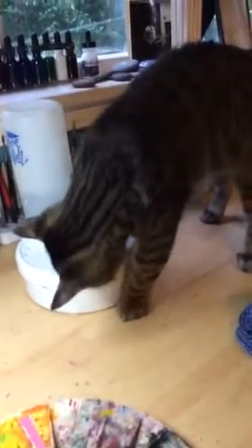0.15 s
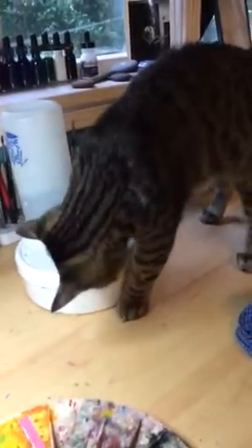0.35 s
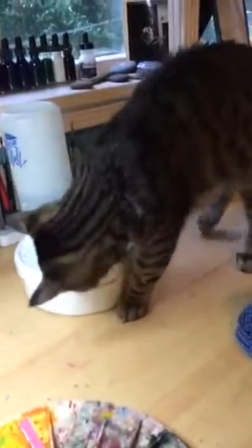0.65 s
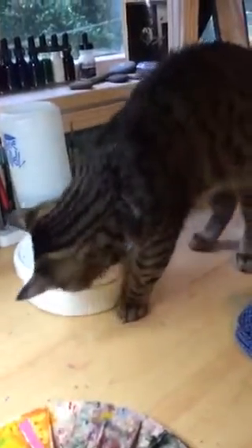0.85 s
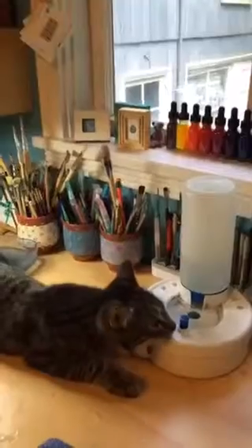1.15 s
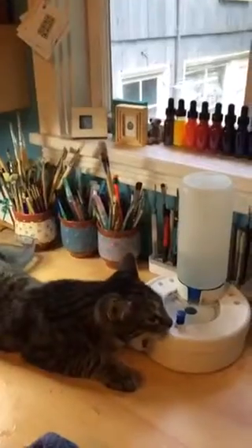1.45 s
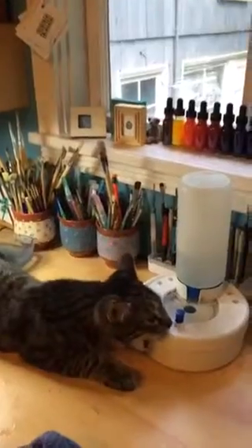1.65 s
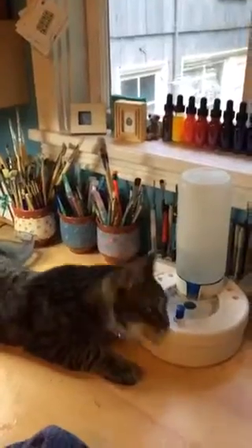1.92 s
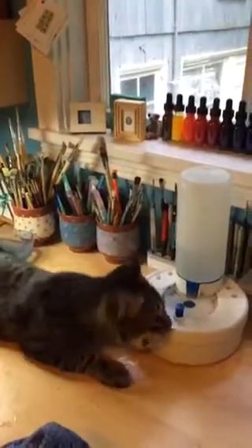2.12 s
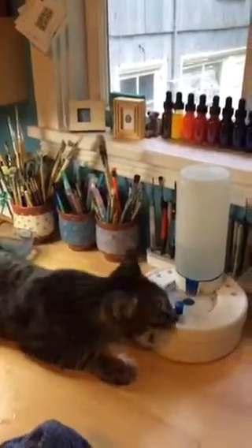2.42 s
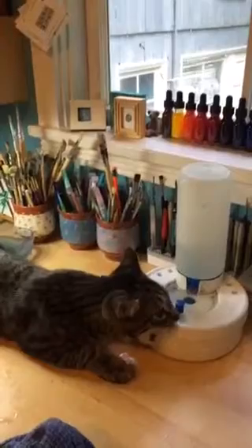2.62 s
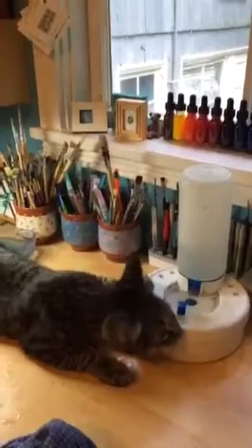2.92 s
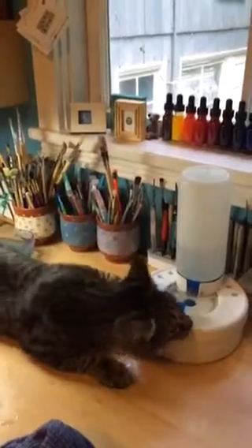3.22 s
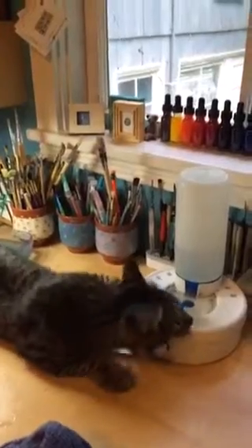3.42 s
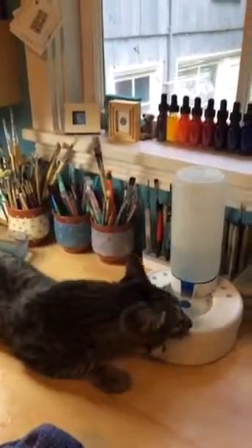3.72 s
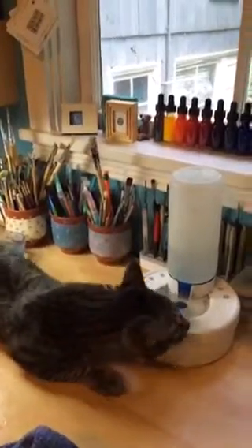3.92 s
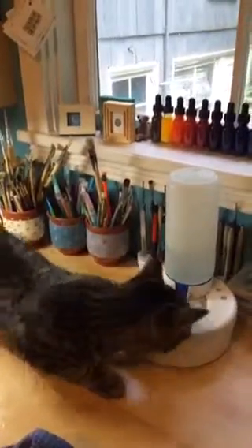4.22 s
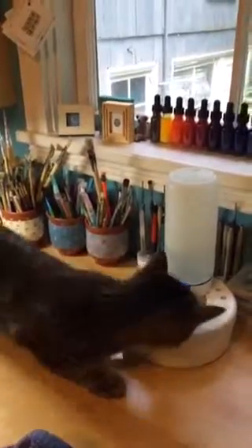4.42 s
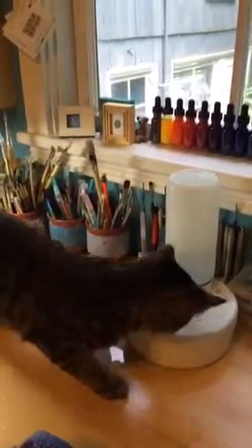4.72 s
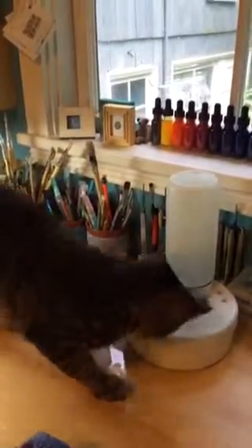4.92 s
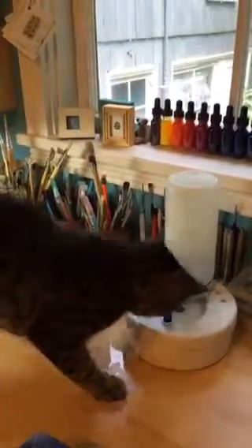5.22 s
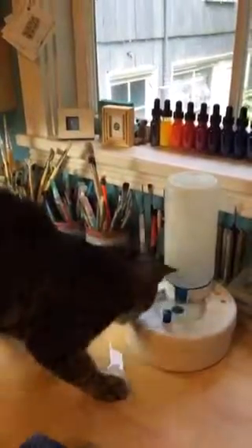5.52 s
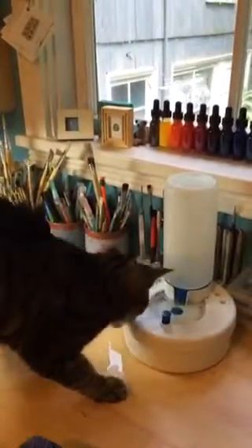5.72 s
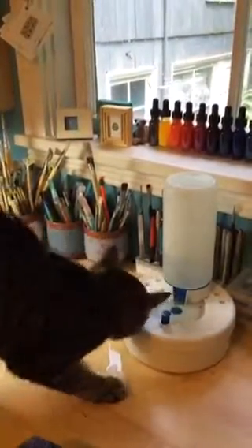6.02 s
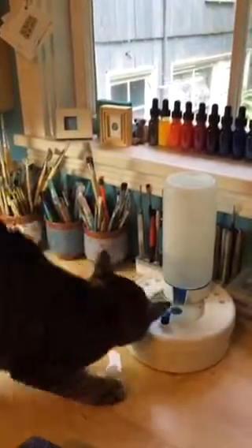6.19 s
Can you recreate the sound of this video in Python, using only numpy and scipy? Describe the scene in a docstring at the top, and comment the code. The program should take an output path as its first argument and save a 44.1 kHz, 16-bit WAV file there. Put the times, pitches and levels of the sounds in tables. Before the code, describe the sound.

A cat noses a plastic water dish on a wooden desk in a small quiet room. Light rim taps grow louder with a tiny water plip, then an instant of total silence and a knock. After that come soft padded bumps, faint fur scuffs and a few heavy, boomy drops of the dish, the sharpest with ticking claws. Hard clacks finish it. Close microphone, low rumble, faint whine.

```python
"""A small, quiet room with a wooden desk, where a cat noses and paws a plastic water dispenser.
Shaped noise makes the rumble and hiss; a wavering tone with overtones makes a faint whine.
Bursts of filtered noise are the brushing fur and ticking claws; damped modes are the hard clacks and bowl taps.
Rising sines are plips of water. Soft pushes and the dropping dish excite the booming desk and plastic base.
The sound drops out once for an instant."""
import sys
import numpy as np
from scipy import signal
from scipy.fft import rfft, irfft, next_fast_len
from scipy.io import wavfile
from scipy.ndimage import map_coordinates

SR = 44100
rng = np.random.default_rng(int(sys.argv[2]) if len(sys.argv) > 2 else 0)


def inscribe(sig):
    """Save sig as 16-bit PCM at rate SR to the path in sys.argv[1].

    A 1-D sig is mono; a 2-D sig holds one channel per row.
    Samples are clipped to [-1, 1] before scaling.
    """
    pcm = np.round(np.clip(np.atleast_2d(sig).T, -1, 1) * 32767)
    wavfile.write(sys.argv[1], SR, pcm.astype(np.int16))


N = 280035  # length [samples]
AGE = np.arange(SR // 2) / SR  # time since a short sound began [s]
GAP_START_S, GAP_END_S = 0.929, 0.953  # the instant of silence
TOP_HZ = 15400  # band limit of the whole sound


def amp(db):
    """Decibels to gain."""
    return 10 ** (np.asarray(db) / 20)


def unit(x):
    """Scale to rms 1."""
    return x / np.sqrt(np.mean(x ** 2) + 1e-20)


def blow(x):
    """Scale a struck sound to rms 1 over its first hundredth of a second."""
    return x / np.sqrt(np.mean(x[:SR // 100] ** 2))


def along(points, hz):
    """Read (frequency [Hz], value) points on a log frequency axis."""
    point_hz, value = np.transpose(points)
    return np.interp(np.log(hz + 1), np.log(point_hz), value)


def fade(t60, t=AGE):
    """Exponential decay, 60 dB down after t60 seconds."""
    return np.exp(-np.log(1000) * t / t60)


def wobble(rate, size=N):
    """A smooth random curve, rate knots a second."""
    knots = rng.standard_normal(int(size * rate / SR) + 4)
    return map_coordinates(knots, [np.arange(size) * rate / SR])


def filtered(x, response):
    """Multiply the spectrum of x by a function of frequency."""
    size = next_fast_len(len(x) + SR // 4)
    hz = np.fft.rfftfreq(size, 1 / SR)
    return irfft(rfft(x, size) * response(hz), size)[:len(x)]


def noise(spectrum, size):
    """Coloured noise of rms 1."""
    return unit(filtered(rng.standard_normal(size), lambda hz: amp(along(spectrum, hz))))


def band(x, centre_hz, octaves):
    """Keep a bell-shaped band, at rms 1."""
    return unit(filtered(x, lambda hz: np.exp(-.5 * (np.log2((hz + 1) / centre_hz) / octaves) ** 2)))


def ring(modes, scatter_db, detune):
    """Sum damped modes; each contact draws new strengths, slight detunings and signs."""
    hz, db, t60 = np.transpose(modes)[:, :, None]
    size, shift, side = rng.standard_normal((3, len(modes), 1))
    waves = np.sign(side) * np.sin(2 * np.pi * hz * (1 + detune * shift) * AGE)
    return np.sum(amp(db + scatter_db * size) * fade(t60) * waves, axis=0)


def add(track, s, x):
    """Mix x into the track from time s [s]."""
    part = track[max(round(s * SR), 0):][:len(x)]
    part += x[:len(part)]


# Decay of the room's tail: (frequency [Hz], t60 [s])
ROOM_DECAY = [(120, 0.39), (400, 0.27), (1500, 0.29), (5000, 0.21), (14000, 0.21)]
# Early wall echoes: (delay [s], relative level [dB])
WALL_ECHOES = [(0.0111, -12.5), (.031, -10), (.042, -16.5)]


def in_room(x, wet_db, walls_db):
    """A short sound with its wall echoes and a diffuse tail whose treble dies first."""
    hz, t, z = signal.stft(rng.standard_normal(len(AGE)), SR, nperseg=256)
    decay = fade(along(ROOM_DECAY, hz)[:, None], t)
    tail = signal.istft(z * decay, SR, nperseg=256)[1][:len(AGE)]
    tail = tail * (1 - np.exp(-(AGE / 0.0037) ** 2))  # the tail builds up over a few milliseconds
    response = amp(wet_db) * tail / np.linalg.norm(tail)
    response[0] = 1  # direct sound
    for delay, db in WALL_ECHOES:
        add(response, delay, amp([db + walls_db]))
    return signal.fftconvolve(x, response)[:len(x)]


# Colour of the room's air: (frequency [Hz], relative level per Hz [dB])
AIR_SPECTRUM = [(22, -20.5), (40, -15.5), (58, 2.5), (105, -4), (170, -4.5), (250, -15.5), (500, -20),
                (1000, -24.5), (2000, -28.5), (5000, -32.5), (10000, -34.5), (15000, -38)]


def air():
    """Steady rumble and hiss of the room: shaped noise with a slight drift in level."""
    level_db = -64.5 + 0.6 * wobble(3.43)
    return amp(level_db) * noise(AIR_SPECTRUM, N)


# Spells of the whine: (start [s], length [s], level before flicker [dB], starting pitch before waver [Hz])
WHINE_SPELLS = [(-0.03, 0.52, -80, 2235), (0.571, 0.54, -84, 2340), (1.01, 0.16, -73.5, 2535),
                (1.148, .72, -87, 2576), (1.95, 0.47, -81, 2220), (2.548, 0.27, -83.5, 2570),
                (2.78, 0.31, -76, 2550), (3.1, 0.2, -78, 2190), (3.48, 0.61, -74.5, 2565),
                (4.199, 0.21, -76.5, 2530), (4.54, 0.26, -82, 2140), (4.82, 0.93, -81, 2527),
                (6.019, 0.2, -74.5, 2570)]
# Whine overtones: (multiple of the pitch, level against the fundamental before any boost [dB])
WHINE_HARMONICS = [(2, -9.5), (4, -15.5), (5, -19)]


def whine():
    """A thin, flickering tone in spells; each fades in, sags in pitch and fades out."""
    sag_hz_per_s, fade_s = 75, 0.06
    early_boost_db = 9.5  # richer overtones in spells that start before the gap
    out, t = np.zeros(N), np.arange(N) / SR
    waver = 1 + .0032 * wobble(60) + 0.0025 * wobble(8.4)
    for start, length, db, hz in WHINE_SPELLS:
        on = (t > start) & (t < start + length)
        age = t[on] - start
        pitch = (hz - sag_hz_per_s * age) * waver[on]
        phase = 2 * np.pi * np.cumsum(pitch) / SR
        overtones = sum(amp(level_db) * np.sin(round(k) * phase) for k, level_db in WHINE_HARMONICS)
        boost = amp(early_boost_db * (start < GAP_START_S))
        envelope = np.minimum(np.minimum(age, length - age) / fade_s, 1)
        out[on] += amp(db) * envelope * (np.sin(phase) + boost * overtones)
    flicker = amp(2.7 * wobble(16))
    return out * flicker


# Strokes of paw and fur: (middle [s], width [s], level at the middle [dB], centre [Hz], bandwidth [octaves])
RUB_STROKES = [(0.509, .064, -74, 5000, 1.2), (1.242, .076, -68.5, 4270, 0.82),
               (1.858, .087, -69.5, 2850, 0.47), (2.567, 0.085, -68.5, 3900, 1.14),
               (3.383, 0.021, -61.5, 2890, 1.24), (3.503, 0.07, -67, 4040, 1.24),
               (4.169, .035, -66, 740, 0.43), (5.004, .024, -61.5, 3200, 2.9),
               (5.088, 0.028, -59.5, 3420, 2.7), (5.993, 0.068, -68, 3070, .4)]
# Colour of the friction before the band filter: (frequency [Hz], relative level [dB])
FRICTION_COLOUR = [(1200, 8.5), (2200, 5.5), (2750, 5), (3400, -5), (4250, 2.5), (5200, 0), (6400, 0),
                   (7900, -1), (8800, -6), (14000, -1.5)]


def rubs():
    """Paws scuff and fur brushes the desk: uneven friction noise swells and fades with each stroke."""
    out = np.zeros(N)
    for s, length, db, hz, octaves in RUB_STROKES:
        unevenness = amp(1.9 * wobble(400.6, size=len(AGE)))
        grains = noise(FRICTION_COLOUR, len(AGE)) * unevenness
        stroke = np.exp(-2 * (AGE / length - 2) ** 2)  # peaks two widths after its start
        rub = amp(db) * stroke * band(grains, hz, octaves)
        add(out, s - 2 * length, in_room(rub, wet_db=-7.0, walls_db=-15))
    return out


# Small hard ticks on plastic, from claws, teeth and the landing dish: (time [s], level at the onset [dB],
# centre [Hz])
SMALL_TICKS = [(0.035, -54.5, 13000), (0.250, -55.5, 2700), (0.716, -55.5, 3000), (1.539, -52, 7000),
               (1.756, -61, 6000), (2.207, -43, 7440), (2.212, -37.5, 2800), (2.2244, -37.5, 6600),
               (2.236, -46, 1990), (2.430, -51.5, 6300), (3.138, -61, 6940), (3.913, -56.5, 5990),
               (4.149, -61, 7000), (4.518, -62, 5000), (4.973, -49.5, 13600), (4.996, -52.5, 2480),
               (5.077, -54, 2800), (5.576, -58.5, 1370), (5.738, -56, 9050), (5.978, -60, 6500),
               (6.122, -54, 3900)]


def ticks():
    """Tiny hard contacts: bands of noise that die in a few milliseconds."""
    out = np.zeros(N)
    for s, db, hz in SMALL_TICKS:
        grit = band(rng.standard_normal(len(AGE)), hz, octaves=0.84)
        tick = amp(db) * grit * fade(0.012)
        add(out, s, in_room(tick, wet_db=-12, walls_db=-23))
    return out


# Hard clacks: (time [s], relative level [dB], treble cutoff [Hz])
HARD_CLACKS = [(6.281, -35, 13200), (6.283, -39.5, 11140), (6.3229, -38.5, 2600), (6.33, -37.5, 1690)]
# Modes of the hard piece, before detuning and scatter: (frequency [Hz], relative level [dB], t60 [s])
HARD_MODES = [(995, 7, 0.06), (1050, 14.5, 0.016), (1450, -8, 0.071), (1840, 7.5, 0.04),
              (2270, 16.5, 0.0092), (2570, 6, 0.052), (3950, -17, 0.097), (5640, -21, 0.034),
              (6930, -11, .035), (7700, -3, .035)]


def clacks():
    """A hard piece strikes and bounces: modes plus a noise burst, with less treble in softer contacts."""
    out = np.zeros(N)
    for s, db, bright_hz in HARD_CLACKS:
        modes = blow(ring(HARD_MODES, scatter_db=3.5, detune=0.0052))
        burst = blow(band(rng.standard_normal(len(AGE)), 3000, 1.5) * fade(0.026))
        hit = modes + amp(-4) * burst
        hit = signal.lfilter(*signal.butter(2, bright_hz, fs=SR), hit)
        add(out, s, in_room(amp(db - 8) * blow(hit), wet_db=-6.5, walls_db=-17))
    return out


# Plips of water: (time [s], level at the onset [dB], starting pitch [Hz])
WATER_PLIPS = [(0.445, -46, 1396), (0.474, -55, 1260)]


def plips():
    """Each bubble is a short sine whose pitch rises as it surfaces."""
    out = np.zeros(N)
    for s, db, hz in WATER_PLIPS:
        bubble = np.sin(2 * np.pi * hz * AGE * (1 + 2.0 * AGE)) * fade(0.025)
        add(out, s, in_room(amp(db) * bubble, wet_db=-9.0, walls_db=-7))
    return out


# Light taps on the rim of the bowl: (time [s], relative level [dB])
RIM_TAPS = [(0.093, -57.5), (0.244, -51.5), (0.42, -46), (0.602, -40), (0.813, -38), (0.818, -36.5)]
# Modes of the rim, before detuning and scatter: (frequency [Hz], relative level [dB], t60 [s])
RIM_MODES = [(425, 0, 0.029), (488, -0.5, 0.018), (615, -0.5, 0.022), (705, -1, 0.047),
             (1036, -11.5, 0.057), (1160, -4, 0.03), (1286, -8, 0.034), (2030, -15.5, 0.019),
             (2480, -15.5, 0.014), (3060, -19.5, 0.013)]


def taps():
    """The muzzle nudges the bowl, whose rim rings in short damped modes."""
    out = np.zeros(N)
    for s, db in RIM_TAPS:
        soft_attack = 1 - np.exp(-AGE / 0.00065)  # a soft nose blunts the attack
        tap = ring(RIM_MODES, scatter_db=1.5, detune=0.017) * soft_attack
        add(out, s, in_room(amp(db - 7.5) * blow(tap), wet_db=-9.5, walls_db=-9.0))
    return out


# Damped desk top at pitch factor 1: (frequency [Hz], bandwidth [Hz], relative level [dB])
DESK_MODES = [(167.5, 54, 0.5), (265, 93, 0), (336, 70.5, -4)]
# Lingering desk modes, before detuning and scatter: (frequency [Hz], relative level [dB], t60 [s])
BOOM_MODES = [(110, -4.5, 0.29), (148.3, -18, 0.35), (178.2, -3, 0.3), (260, -18.5, 0.082),
              (276.9, -2.5, 0.21), (354.6, -8, 0.16)]
# Crowd of short modes in the base at pitch factor 1: (frequency [Hz], relative level per Hz [dB])
SHELL_SPECTRUM = [(200, -15), (400, 2), (520, 7.5), (630, 2.5), (760, 2), (1020, -2.5), (1250, -7),
                  (1550, -10), (2100, -14.5), (2800, -22.5), (5000, -37.5)]
# Longer modes of the base, before detuning and scatter: (frequency [Hz], relative level [dB], t60 [s])
PLASTIC_MODES = [(544, 3.5, 0.075), (716, 4, 0.043), (1000, -13, 0.23), (1377, -14, 0.14),
                 (1660, -19, 0.043), (2000, -38.5, 0.056)]
# Colour of the contact crack: (frequency [Hz], relative level per Hz [dB])
CRACK_SPECTRUM = [(300, 18), (1000, 6), (2500, -7), (4500, -6.5), (8000, -7.5), (11000, -14.5),
                  (15000, -33)]


def knock(thud_db, shell_db, crack_db, rise, pitch):
    """A contact gives a short desk thud, a slower boom, a clatter of plastic and a crack; rise in seconds."""
    def desk_response(hz):
        total = 0
        for k, (centre, width, db) in enumerate(DESK_MODES):
            damping = 1j * hz * width
            total = total + (-1) ** k * amp(db) * damping / (centre * centre - hz * hz + damping)
        return total

    contact = 1 - np.exp(-AGE / rise)  # a padded paw presses in slowly
    impulse = signal.unit_impulse(len(AGE))
    thud = blow(filtered(impulse, lambda hz: desk_response(hz / pitch)) * contact)
    boom = blow(ring(BOOM_MODES, scatter_db=1.5, detune=0.0034))
    boom = boom * (1 - np.exp(-AGE / 0.013))  # the wide board takes time to get going
    boom = signal.lfilter(*signal.butter(4, 350 * pitch, fs=SR), boom)  # a yielding spot spares the higher modes
    board = thud + amp(-13) * (1 + rise / 0.004) * boom  # a slow push leaves more boom than thud
    board = signal.lfilter(*signal.butter(2, 70, 'high', fs=SR), board)  # the knock keeps no deep bass below 70 Hz
    wood = amp(thud_db + 1.5) * in_room(board, wet_db=-10.5, walls_db=-0.5)

    shell = blow(noise(np.multiply(SHELL_SPECTRUM, (pitch, 1)), len(AGE)) * fade(0.033))
    body = shell + amp(-9.5) * blow(ring(PLASTIC_MODES, scatter_db=4.0, detune=0.0073))
    crack = noise(CRACK_SPECTRUM, len(AGE)) * fade(0.017)
    plastic = amp(shell_db - 1.0) * blow(body * contact)
    plastic = plastic + amp(crack_db + 3.0) * blow(crack * contact)
    return wood + in_room(plastic, wet_db=-7.5, walls_db=-10.5)


# Soft pushes of paw or muzzle on the dish: (time [s], relative desk thud level [dB],
# relative plastic shell level [dB], time constant of the push [s], pitch factor of the spot)
SOFT_PUSHES = [(0.118, -61, -73, 0.0027, 1.1), (0.498, -49.5, -61, .0015, 0.89),
               (1.105, -59, -65.5, .002, 1.05), (1.489, -42.5, -62.5, 0.0071, 0.92),
               (1.755, -46, -52.5, 0.0082, .81), (2.187, -40.5, -52, 0.021, 0.96),
               (2.429, -57.5, -54, .0017, .87), (2.759, -48.5, -63.5, 0.008, 0.96),
               (2.838, -57.5, -62.5, 0.019, 1.04), (2.862, -45, -61, 0.0057, .82),
               (3.402, -58.5, -60.5, 0.0061, 1.25), (3.583, -54, -63, 0.002, 0.86),
               (4.027, -51.5, -58, 0.013, 0.97), (4.149, -51, -61, 0.013, 0.77),
               (6.121, -64.5, -57, 0.0033, 1.65), (6.192, -56.5, -80, .003, 0.64)]


def pushes():
    """Padded contacts sound the same desk and dish, with hardly any crack."""
    out = np.zeros(N)
    for s, thud_db, shell_db, rise, pitch in SOFT_PUSHES:
        add(out, s, knock(thud_db, shell_db, shell_db - 14.5, rise, pitch))
    return out


# The tipped dish drops back: (time [s], relative thud level [dB], hardness of the landing [0-1],
# relative contact crack level [dB], time to the rebound [s])
DISH_DROPS = [(0.9539, -40, 1, -46, .019), (0.959, -35.5, 0.92, -53, .024),
              (1.881, -26.5, 0.54, -59.5, .044), (2.211, -26, 1, -38.5, 0.028),
              (3.275, -31, 0.72, -45, 0.028), (5.930, -32, 0.08, -51.5, .047)]


def drops():
    """The dish lands and rebounds once, weaker and duller; hardness sets attack, pitch and clatter."""
    out = np.zeros(N)
    for s, db, hardness, crack_db, flight in DISH_DROPS:
        # from the softest to the hardest landing
        rise = np.interp(hardness, (0, 1), (0.0027, 0.00039))  # time constant [s]
        pitch = np.interp(hardness, (0, 1), (0.8, 1.187))
        shell_db = db + np.interp(hardness, (0, 1), (-20, -7.5))
        landing = knock(db, shell_db, crack_db, rise, pitch)
        rebound = knock(db - 11.5, shell_db - 17, crack_db - 12, rise=0.0147, pitch=pitch * 0.9)
        add(out, s, landing)
        add(out, s + flight, rebound)
    return out


def scene():
    """All sources at one microphone, from the background to the dish."""
    background = air() + whine()
    small_sounds = rubs() + ticks() + clacks() + plips() + taps()
    return (background + small_sounds + pushes() + drops())[None]


def record(dry):
    """The sound drops out for an instant; nothing is kept above the band limit."""
    t = np.arange(N) / SR
    live = (t < GAP_START_S) | (t > GAP_END_S)
    return filtered(dry[0] * live, lambda hz: hz < TOP_HZ)[None]


dry = scene()
out = record(dry)
inscribe(out)
```